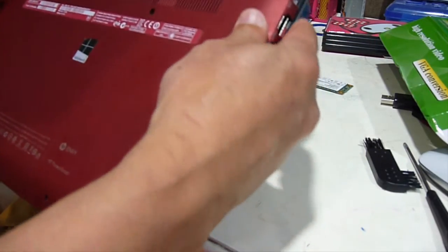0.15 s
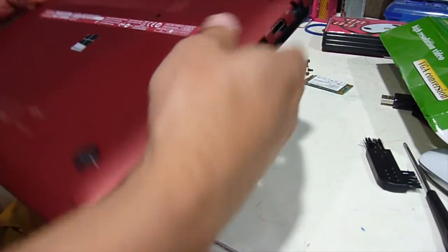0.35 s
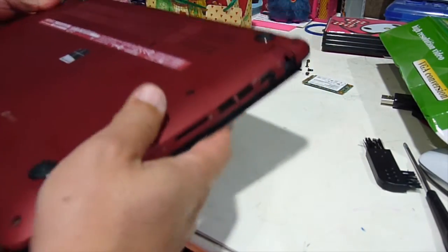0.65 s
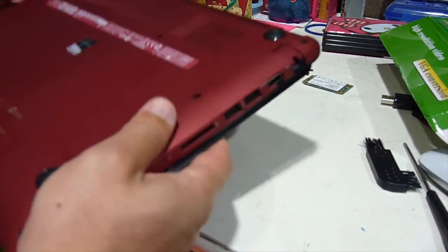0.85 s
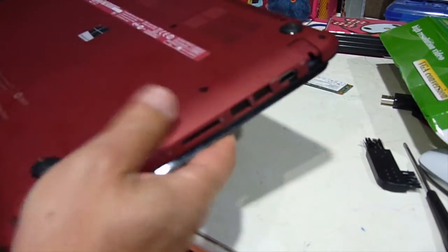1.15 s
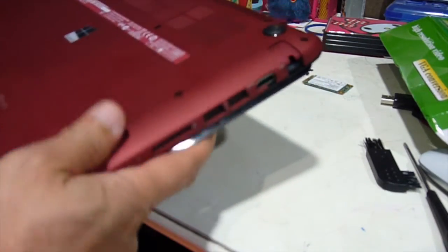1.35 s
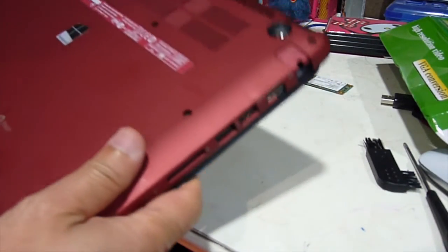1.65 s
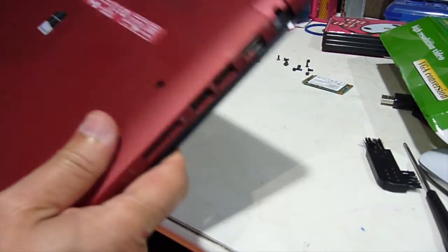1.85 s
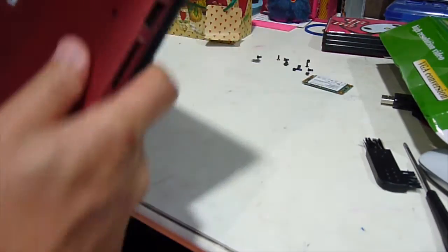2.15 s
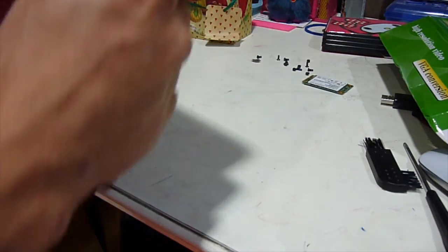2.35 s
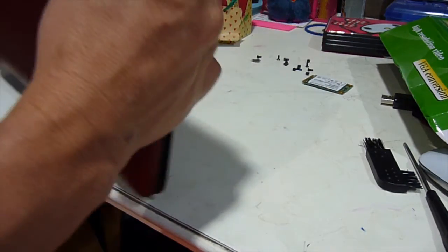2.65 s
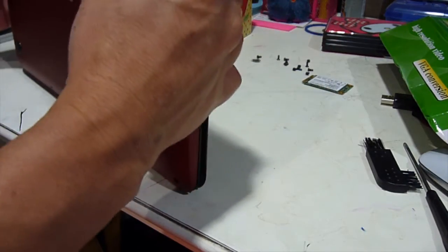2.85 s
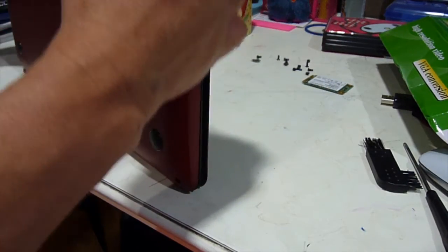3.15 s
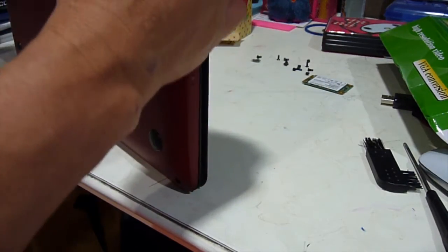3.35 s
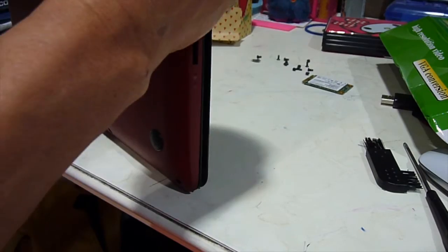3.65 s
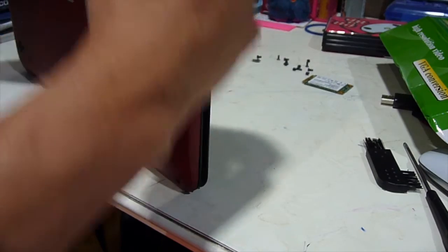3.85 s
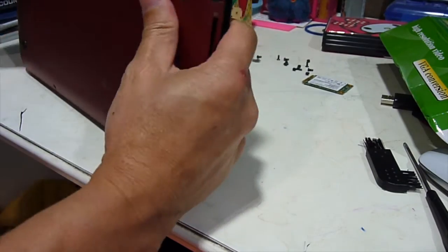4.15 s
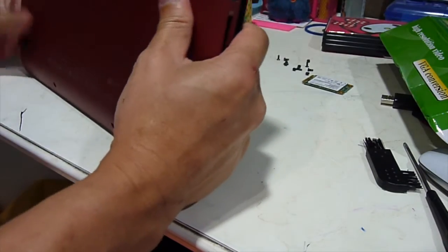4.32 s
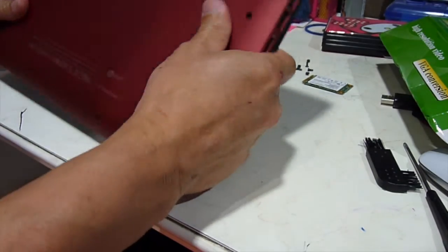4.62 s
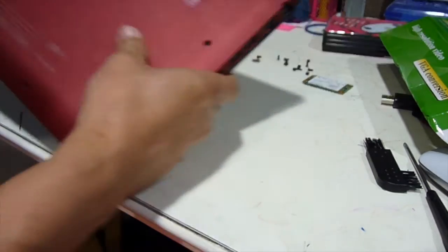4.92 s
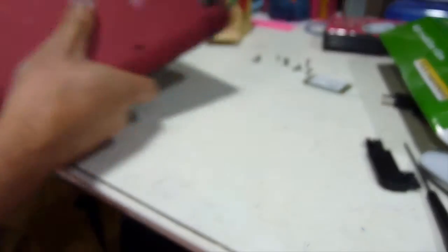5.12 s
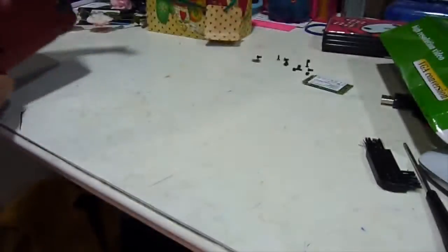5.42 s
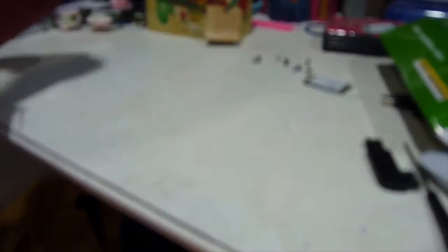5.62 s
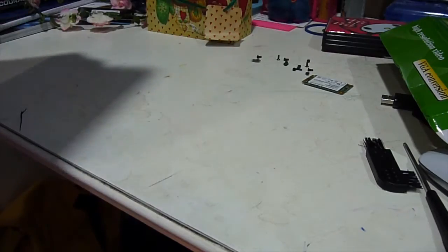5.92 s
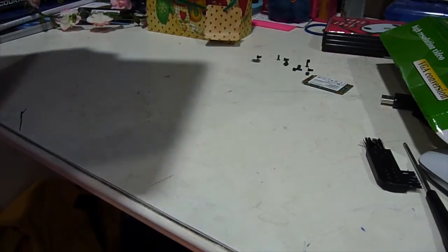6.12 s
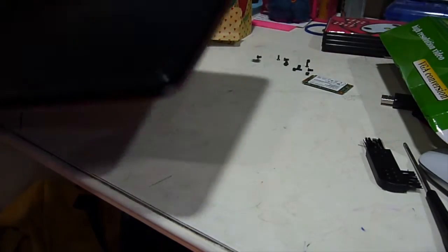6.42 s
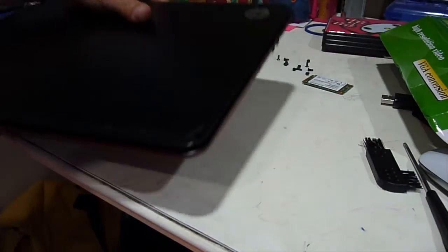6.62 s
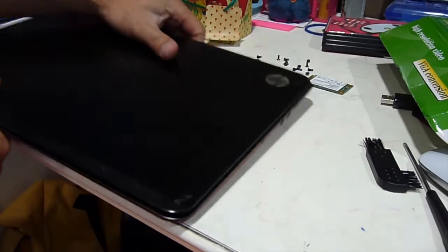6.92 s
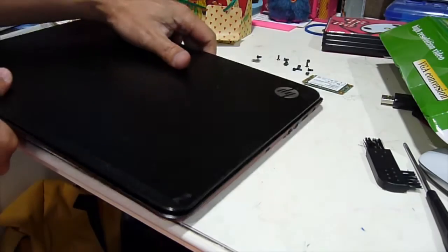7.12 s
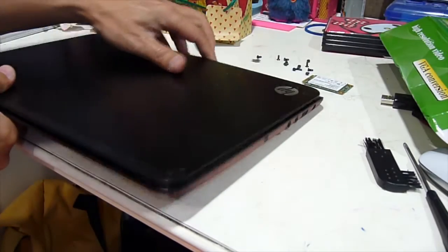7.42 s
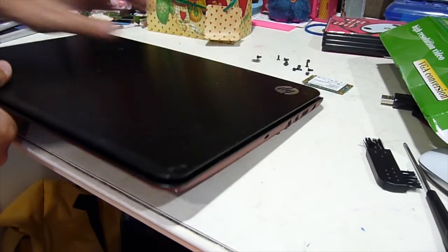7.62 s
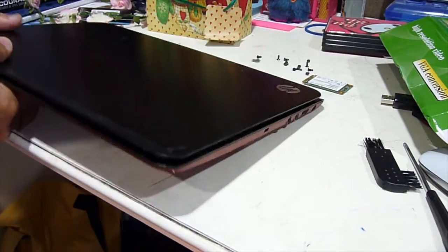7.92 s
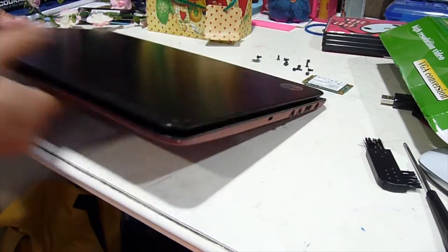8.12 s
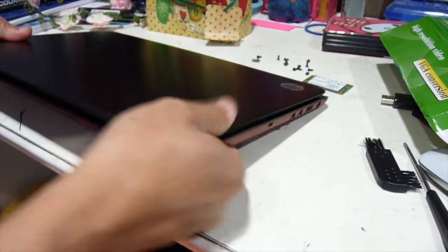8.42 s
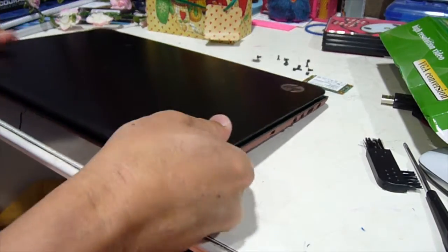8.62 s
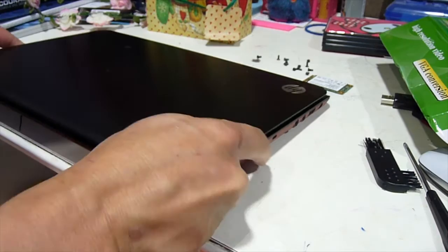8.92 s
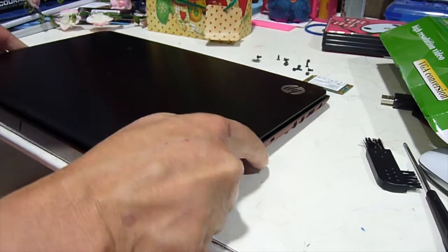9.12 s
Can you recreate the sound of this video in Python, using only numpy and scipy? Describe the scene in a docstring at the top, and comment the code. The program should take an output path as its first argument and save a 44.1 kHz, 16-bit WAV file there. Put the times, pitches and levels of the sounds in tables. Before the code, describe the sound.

A small, dry room with a faint far-off fan: a low unsteady hum and patchy rumble under soft camera hiss and barely audible thin whines. A tiny seam tick at 0.2 s, then a short, hard hollow plastic knock at 0.8. Faint ticks around 1.7 to 2.2. At 2.8 to 3.0 the case edge meets the desk in a quick cluster of fuller, woody thumps. Light ticks near 4.0 and 4.4, with soft grainy palm rubs from 4.3 to 5.4. A bright, crisp knock at 5.3, then a faint brush around 5.7 to 6.3. A sharp clack at 6.35, with ticks around it. Set-down bumps follow at 6.95 and 7.15, then a strong knock at 7.47 with rapid fading rebounds. Softer taps at 7.8, 8.1, 8.3, 8.5 and 9.0 leave only the hiss and weakening hum.

```python
"""A plastic laptop case is turned in two hands and set down on a wooden desk in a small room.
Each knock is a short swing of the struck spots plus damped modes of case shell, desk top and frame.
Seams tick as one small spot of the case; palms slide on the plastic as shaped, swelling noise.
Behind them a fan far off hums an unsteady tone over a patchy rush of noise.
A small camera microphone takes it all, adding its hiss, thin whines and a constant offset."""
import sys
import numpy as np
from scipy import signal
from scipy.fft import rfft, irfft, next_fast_len
from scipy.io import wavfile
from scipy.ndimage import uniform_filter1d, map_coordinates

SR = 44100
rng = np.random.default_rng(int(sys.argv[2]) if len(sys.argv) > 2 else 0)


def store_wav(level_fs):
    """Save 16-bit WAV to argv[1]."""
    pcm = np.round(np.clip(np.atleast_2d(level_fs), -1, 1) * 32767)
    wavfile.write(sys.argv[1], SR, pcm.T.astype(np.int16))


N = 408630

# Far fan, spectrum of the rush: (frequency [Hz], relative density [dB per Hz])
FAN_RUSH = [(24, -47), (40, -16), (75, -5), (113, -8.5), (145, -2.5), (193, -7.5), (226, -2.5), (334, -12),
            (396, -10.5), (900, -23), (1170, -59.5), (1980, -120)]
# Far fan, course of the tone before its trim and flutter: (time [s], level [dB])
FAN_TONE = [(0.0, -67), (1.4, -73.5), (2.14, -58.5), (2.6, -65.5), (3.25, -62), (4.54, -58.5), (4.8, -67),
            (7.5, -71.5), (9.27, -85)]
FAN_RUSH_DB = -64  # rms ahead of the microphone response

# Small room, decay of its answer: (frequency [Hz], time to fall 60 dB [s])
ROOM_DECAY = [(100, 0.2), (500, 0.21), (1500, 0.13), (3000, 0.14), (4000, 0.071), (6000, 0.066)]

# Camera microphone, spectrum of the hiss: (frequency [Hz], relative density [dB per Hz])
MIC_HISS = [(300, -24.5), (700, 0), (1200, -2.5), (2000, -7.5), (3000, -9.5), (4500, -12), (6000, -13),
            (7600, -12)]
# Camera microphone, response with bass and treble roll-off: (frequency [Hz], gain [dB])
MIC_RESPONSE = [(25, -10), (45, 3.5), (70, 1.62), (6600, 2.86), (7000, -2.5), (7250, -12.5), (7500, -23.5)]
# Camera electronics, steady whines: (frequency [Hz], rms level [dB])
CAMERA_WHINES = [(4290, -100), (5329, -101), (6218, -101), (6659, -90)]
MIC_HISS_DB = -69  # rms ahead of the microphone response
BAND_LIMIT_HZ, OFFSET = 7550, -.0057  # offset as a share of full scale

# Palms, strokes on the plastic: (start [s], length [s], drag level [dB], swish level [dB])
PALM_STROKES = [(3.897, 0.22, -72, -79), (4.338, 0.14, -57.5, -69), (4.443, 0.46, -65.5, -85),
                (4.894, 0.58, -72.5, -79), (5.654, 0.15, -61.5, -77), (5.735, 0.58, -74, -70.5)]
# Pressed skin, spectrum of the drag: (frequency [Hz], relative density [dB per Hz])
DRAG_SPECTRUM = [(200, 1), (380, 0), (480, 5.5), (620, -7), (900, 0), (1300, -9.5), (2000, -27.5)]
# Light skin, spectrum of the swish: (frequency [Hz], relative density [dB per Hz])
SWISH_SPECTRUM = [(700, -25), (1300, -3), (2000, 0), (2700, -3), (3500, -14), (5000, -35)]
STROKE_RISE = 0.29  # share of a stroke spent swelling

# Desk top modes: (frequency [Hz], relative level [dB], time to fall 60 dB at length factor 1 [s])
DESK_TOP = [(151, -1, .2), (204, -4, .22), (225, -2, .23), (258, -2, .13), (300, -2, .1)]
# Desk frame modes: (frequency [Hz], relative level [dB], time to fall 60 dB at length factor 1 [s])
DESK_FRAME = [(76, -7, 0.2), (90, 9.5, 0.14), (118, 13, 0.034)]
# Case shell modes: (frequency [Hz], relative level [dB], time to fall 60 dB at length factor 1 [s])
CASE_SHELL = [(325, -3, .08), (355, -4, .08), (388, 0, .12), (412, -1, .1), (440, -2, .08), (500, -6, .1),
              (565, -4, .06), (620, -4, .06), (690, -3, .05), (768, 0, .05), (850, -1, .06), (930, -3, .05),
              (1015, -2, .06), (1080, -3, .05), (1180, -4, .05), (1348, -1, .06), (1420, -3, .05),
              (1515, -3, .05), (1650, -3, .05), (1800, -3, .04), (1990, -4, .04), (2130, -4, .04),
              (2280, -3, .04), (2450, -4, .04), (2690, -5, .03), (2900, -8, .03), (3150, -8, .03),
              (3500, -11, .02), (3900, -14, .015)]
# Bare edge of a hard contact, spectrum of the snap: (frequency [Hz], relative level [dB])
SNAP_SPECTRUM = [(2500, -45), (3500, -9.5), (5000, 0.5), (7500, 2)]
# Ribs, edge and corner, stiffer than the case walls: (frequency [Hz], level before hardness [dB],
# narrowness [dB per octave squared], decay of the first blow [cycles])
STIFF_PARTS = [(1458, -0.65, 40, 0.99), (2315, -5.5, 16.5, 0.52), (3056, -9.5, 41.5, 0.76)]
# Knocks of the case: (first touch [s], wall level [dB], hardness [dB per step of stiffness],
# lid level [dB over walls], snap level [dB over walls], desk top level [dB over walls],
# frame level [dB over walls], lid pitch [Hz], wall pitch [Hz], ring length [factor])
CASE_KNOCKS = [(0.777, -29, -3, -8, -41, -25, -45, 516, 984, 0.43),
               (2.762, -38, -6, 13.5, -51, -18, -8, 380, 690, 0.44),
               (2.766, -30, -4, 2, -56, 2.3, -3.5, 426, 648, 1),
               (2.831, -32.5, -0.5, 12.5, -28.5, 10, -3, 432, 722, 1),
               (2.964, -45.5, -1, 19, -44, 17.5, 8, 420, 650, 1),
               (5.32, -26.5, 1.02, 1.9, -15, -16, -25, 495, 775, 0.29),
               (5.683, -67, 1, 24.5, -20, -2, -35, 292, 614, 0.94),
               (5.71, -54.5, -1, 6, -17, -1, -15, 314, 622, .9),
               (6.347, -27, 0, 5, -21.5, -32, -36, 710, 1380, 0.35),
               (6.954, -39.5, -2.5, -0.8, -49, -0.5, -7.5, 517, 870, 0.84),
               (7.15, -36.5, -0.5, 0, -37, -20, -20.5, 410, 972, 1),
               (7.465, -26, -0.5, -3, -39, -6, -5.5, 424, 670, 0.42),
               (7.493, -35.5, -1.5, -3, -36, 2.5, -6, 390, 1026, 0.6),
               (7.539, -42.5, -1.5, -3.5, -33, -5, -5, 401, 702, 0.87),
               (7.608, -58, -2, 7.5, -23, 3, -1, 310, 790, 0.3),
               (7.839, -53.5, 0, 7.5, -25, -10, 4.5, 415, 740, 0.4),
               (8.092, -39.5, -0.5, 2, -28, -6.5, -26, 433, 770, 0.75),
               (8.281, -36.5, -1.5, -1.5, -40, -7, -12.5, 516, 1390, 1),
               (8.517, -48, -1.5, 1, -21, -10, -13, 440, 674, 1),
               (9.031, -46, -1.5, 3.5, -49, -4, -27, 595, 1380, 0.66)]
# Seam ticks: (first touch [s], level [dB], pitch [Hz], focus [0-1, higher is narrower])
SEAM_TICKS = [(0.221, -44.5, 1200, .4), (0.247, -61, 1400, .4), (0.746, -58.5, 950, 0.95),
              (1.67, -44.5, 1100, 0.52), (1.841, -55.5, 2500, 0.54), (2.152, -52, 1840, 0.71),
              (3.951, -55.5, 1110, 0.23), (4.109, -43.5, 1090, 0.15), (4.381, -55, 1700, 0.59),
              (4.406, -46, 1140, 0.57), (4.847, -47, 585, 0.18), (4.887, -51, 305, .45),
              (4.97, -61, 1300, .4), (5.0, -50.5, 1040, 0.83), (6.288, -48, 2160, 0.13),
              (6.368, -37, 1340, 0.87), (6.469, -49.5, 1580, 0.22), (7.443, -60, 1600, .35),
              (7.973, -54.5, 1380, 0.56), (8.317, -56, 2300, .4), (8.408, -50, 880, 0.15),
              (8.563, -56, 710, .4)]
# Ring over the first blow [dB], ring length [factor], narrowness at focus 1 [dB per octave squared]
TICK_RING_DB, TICK_LENGTH, TICK_NARROW_DB = -2.5, 0.23, 24
# Ring over the first blow at snap 0 dB [dB], its loss [dB per dB of snap], touch to full blow [s]
KNOCK_RING_DB, RING_LOSS, LEAD_S = -8.5, 0.15, 0.001704


def amp(db):
    """Gain of a level in dB."""
    return 10 ** (np.asarray(db) / 20)


def unit(x):
    """x at rms 1."""
    return x / np.sqrt(np.mean(x ** 2) + 1e-20)


def along(points, hz):
    """Interpolate (Hz, value) points on a log frequency axis."""
    f, v = np.transpose(points)
    return np.interp(np.log(hz + 1), np.log(f + 1), v)


def curve(rows):
    """(s, dB) rows as one level per sample, -140 dB outside the rows."""
    times, levels = np.transpose(rows)
    return np.interp(np.arange(N) / SR, times, levels, left=-140, right=-140)


def wobble(rate):
    """A smooth random curve, rate knots a second."""
    knots = rng.standard_normal(int(N * rate / SR) + 4)
    return map_coordinates(knots, [np.arange(N) * rate / SR])


def coloured(x, spectrum):
    """x shaped by (Hz, dB) points."""
    m = next_fast_len(len(x) + 8192)
    gain = amp(along(spectrum, np.fft.rfftfreq(m, 1 / SR)))
    return irfft(rfft(x, m) * gain, m)[:len(x)]


def fan():
    """The far fan: a tone unsteady in pitch and level over a rush patchy in time and frequency."""
    z = signal.stft(rng.standard_normal(N), nperseg=512)[2]
    patches = uniform_filter1d(rng.standard_normal(z.shape), 6, 0)
    patches = unit(uniform_filter1d(patches, 10, 1))
    rush = signal.istft(z * amp(1.4 * patches), nperseg=512)[1][:N]
    pitch_hz = 228 + 7 * wobble(14)
    tone_db = curve(FAN_TONE) - 6.5 + 4.5 * wobble(16)
    tone = np.sin(2 * np.pi * np.cumsum(pitch_hz) / SR) * amp(tone_db)
    return amp(FAN_RUSH_DB) * unit(coloured(rush, FAN_RUSH)) + tone


def room(x):
    """The walls answer 3.77 ms later with noise, each frequency dying at its own speed."""
    hz, t, z = signal.stft(rng.standard_normal(SR // 3), SR, nperseg=256)
    decay = amp(-60 * t / along(ROOM_DECAY, hz)[:, None])
    tail = signal.istft(z * decay, SR, nperseg=256)[1]
    delayed = np.pad(x, (round(0.00377 * SR), 0))
    return signal.fftconvolve(delayed, tail / np.linalg.norm(tail))[:len(x)]


def palms():
    """Pressed skin drags in grains through the panels; light skin swishes more smoothly."""
    t = np.arange(N) / SR
    grains = rng.standard_normal(N) * amp(3.5 * wobble(200) + 2.5 * wobble(40))
    smooth = rng.standard_normal(N) * amp(1.5 * wobble(60))
    drag_gain, swish_gain = np.zeros(N), np.zeros(N)
    for s, length, drag_db, swish_db in PALM_STROKES:
        swell = np.interp(t, [s, s + STROKE_RISE * length, s + length], [0, 1, 0])
        drag_gain += amp(drag_db) * swell
        swish_gain += amp(swish_db) * swell
    drag = drag_gain * unit(coloured(grains, DRAG_SPECTRUM))
    swish = swish_gain * unit(coloured(smooth, SWISH_SPECTRUM))
    return drag + swish


def push(t, hz, cycles):
    """The first blow: a brief swing of the struck spot, decaying by e in so many cycles, peak 1."""
    u = t * hz / cycles
    wave = u * u * np.exp(-u) * np.sin(2 * np.pi * hz * t)
    return wave / np.abs(wave).max()


def ring(modes, t, reach_db, length, order):
    """Damped modes, peak 1, redrawn for each blow; reach_db(Hz) is how well it reaches each mode."""
    hz, db, t60 = np.transpose(modes)[:, :, None]
    db = db + reach_db(hz) + 2 * rng.standard_normal(hz.shape)
    hz = hz * (1 + .008 * rng.standard_normal(hz.shape))
    # every order-th mode starts opposed, so the sum swells and beats
    sign = np.where(np.arange(len(hz))[:, None] % order, 1, -1)
    decay = amp(db - 60 * t / (length * t60))
    waves = (sign * np.sin(2 * np.pi * hz * t) * decay).sum(0)
    waves = waves * (1 - np.exp(-t / .0008))  # soft onset
    return waves / np.abs(waves).max()


def part(t, hz, narrow_db, cycles, ring_db, length):
    """One spot of the case: its first blow and the shell modes near it."""
    def reach_db(f):
        return -narrow_db * np.log2(f / hz) ** 2
    return push(t, hz, cycles) + amp(ring_db) * ring(CASE_SHELL, t, reach_db, length, order=4)


def desk_blow(t, modes, push_hz, cycles, push_gain, length):
    """The desk top or frame: all its modes and one low first blow."""
    modes_ring = ring(modes, t, np.zeros_like, length, order=2)
    return modes_ring + push_gain * push(t, push_hz, cycles)


def edge_snap(t):
    """A bare hard edge: a burst of bright noise, gone in milliseconds, and one high first blow."""
    noise = unit(coloured(rng.standard_normal(len(t)), SNAP_SPECTRUM))
    return noise * amp(-60 * t / 0.0058 - 6.0) + 3.15 * push(t, 3950, cycles=0.47)


def add(out, s, blow):
    """A corner touches lightly just before the full blow, which the room answers."""
    touch, full = round(s * SR), round((s + LEAD_S) * SR)
    out[touch:][:len(blow)] += amp(-18) * blow
    out[full:][:len(blow)] += blow + amp(-12.0) * room(blow)


def contacts():
    """Knocks ring lid, walls and stiffer parts and shake the desk; a tick rings one spot."""
    out, t = np.zeros(N + SR), np.arange(SR // 3) / SR
    for s, db, hard_db, lid_db, snap_db, desk_db, frame_db, lid_hz, wall_hz, length in CASE_KNOCKS:
        ring_db = KNOCK_RING_DB - RING_LOSS * snap_db
        lid = amp(lid_db) * part(t, lid_hz, 31.0, 0.34, ring_db, length)
        shell = lid + part(t, wall_hz, 45, 0.73, ring_db, length)
        for k, (hz, level_db, narrow_db, cycles) in enumerate(STIFF_PARTS):
            stiff_db = level_db + (k + 3.5) * hard_db  # hardness counts more on each stiffer part
            shell = shell + amp(stiff_db) * part(t, hz, narrow_db, cycles, ring_db, length)
        desk = amp(desk_db) * desk_blow(t, DESK_TOP, 158.4, 0.36, 1.36, length)
        boom = amp(frame_db) * desk_blow(t, DESK_FRAME, 58, 0.17, 0.28, length)
        snap = amp(snap_db) * edge_snap(t)
        add(out, s, amp(db) * (shell + desk + boom + snap))
    for s, db, hz, focus in SEAM_TICKS:
        # focus also sets the decay of the first blow, in cycles
        tick = part(t, hz, TICK_NARROW_DB * focus, focus, TICK_RING_DB, TICK_LENGTH)
        add(out, s, amp(db) * tick)
    return out[:N]


def scene():
    """Far fan, palms and laptop at one microphone."""
    return (fan() + palms() + contacts())[None]


def record(dry):
    """The camera adds hiss, thin whines and an offset, and keeps nothing above its band limit."""
    t = np.arange(N) / SR
    hiss = amp(MIC_HISS_DB) * unit(coloured(rng.standard_normal(N), MIC_HISS))
    x = coloured(dry[0] + hiss, MIC_RESPONSE)
    for hz, db in CAMERA_WHINES:
        x = x + np.sqrt(2) * amp(db) * np.sin(2 * np.pi * hz * t)
    m = next_fast_len(N + 8192)
    in_band = np.fft.rfftfreq(m, 1 / SR) < BAND_LIMIT_HZ
    return irfft(rfft(x, m) * in_band, m)[None, :N] + OFFSET


dry = scene()
out = record(dry)
store_wav(out)
```